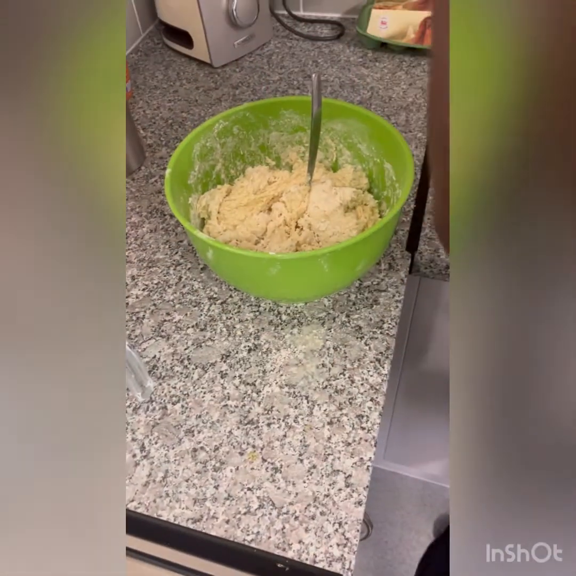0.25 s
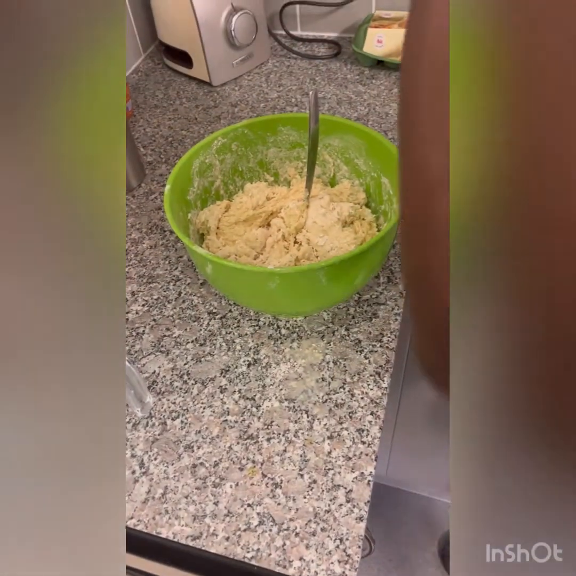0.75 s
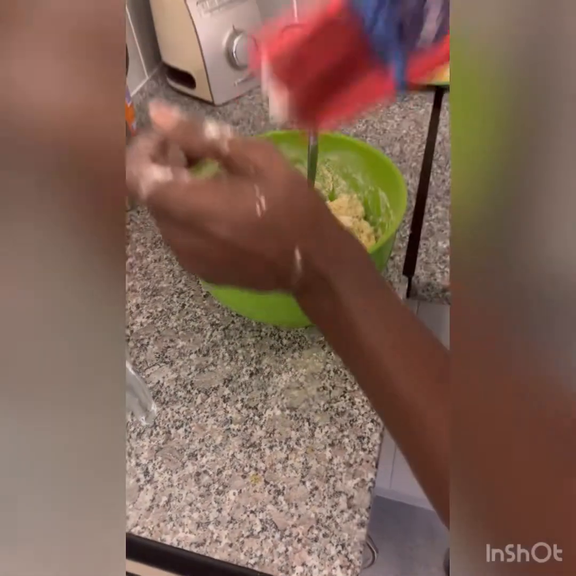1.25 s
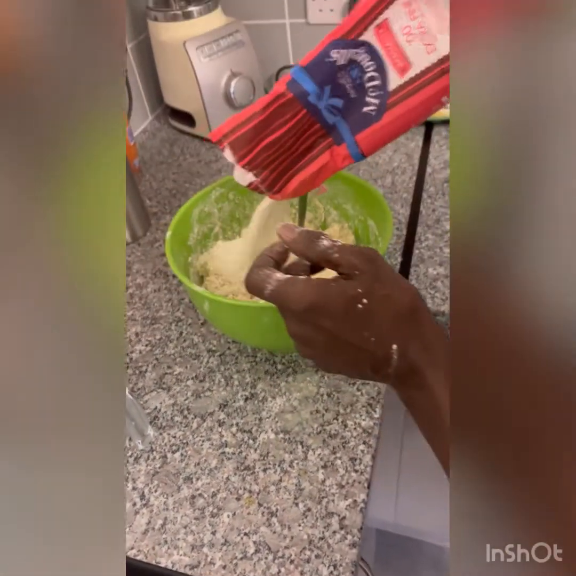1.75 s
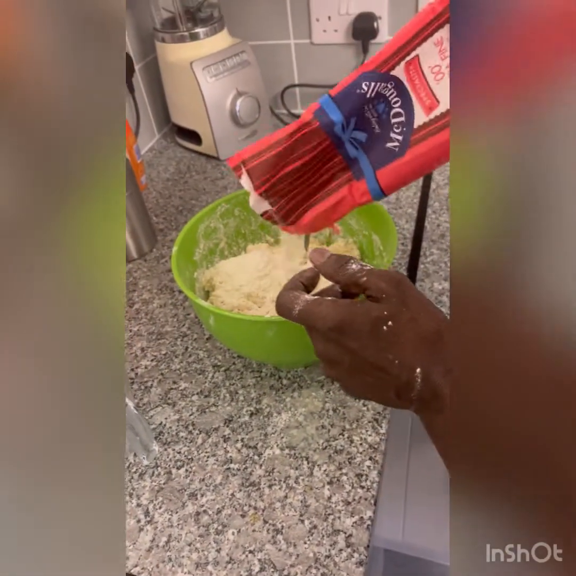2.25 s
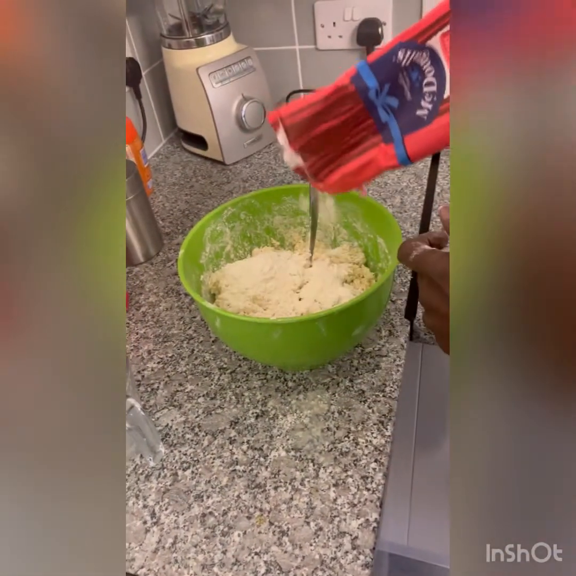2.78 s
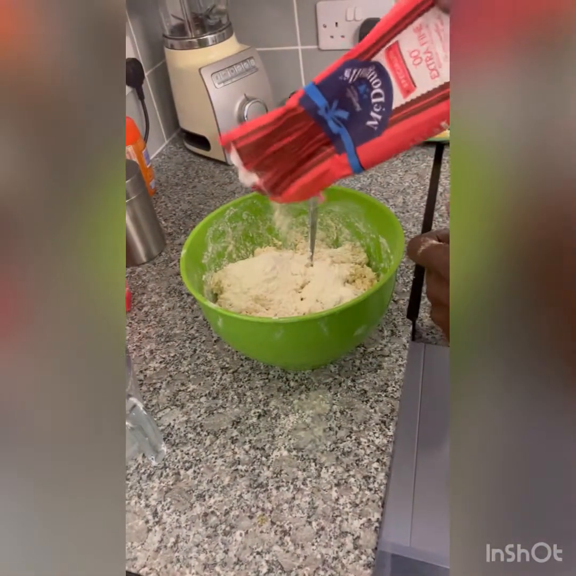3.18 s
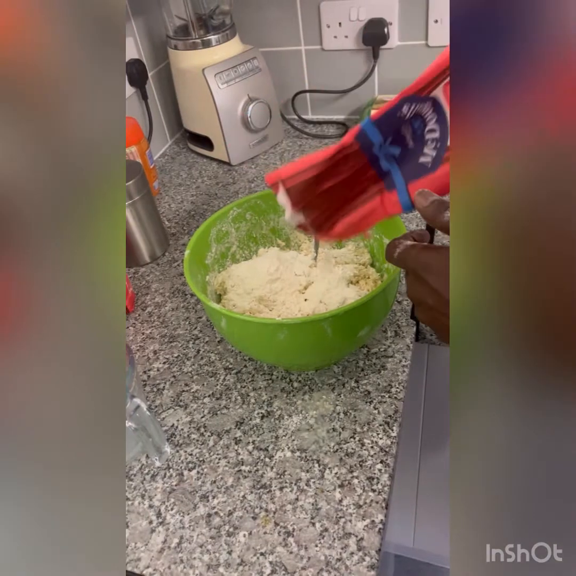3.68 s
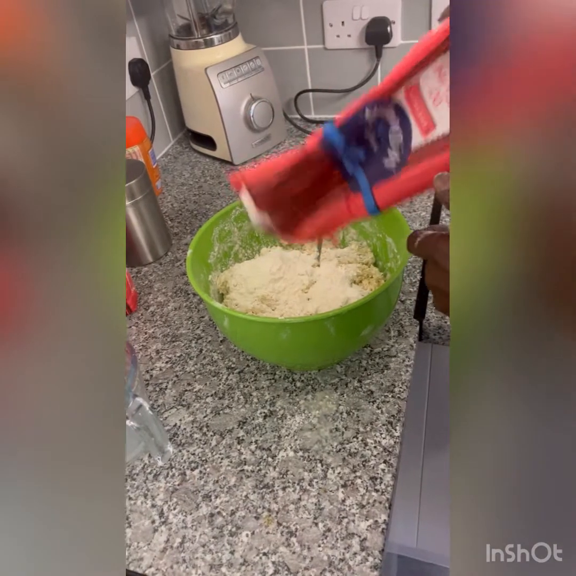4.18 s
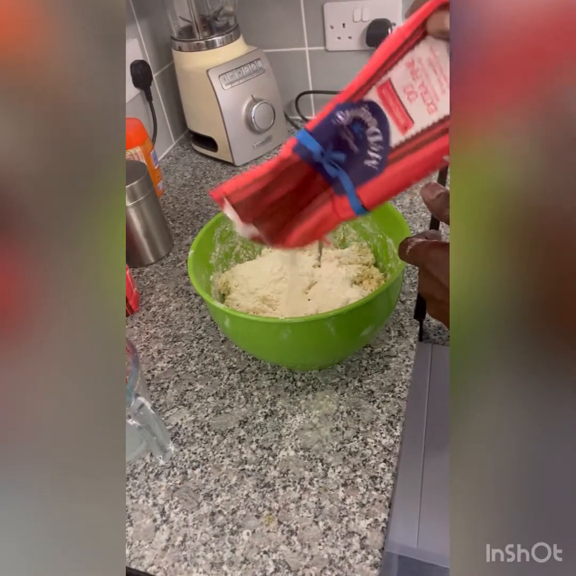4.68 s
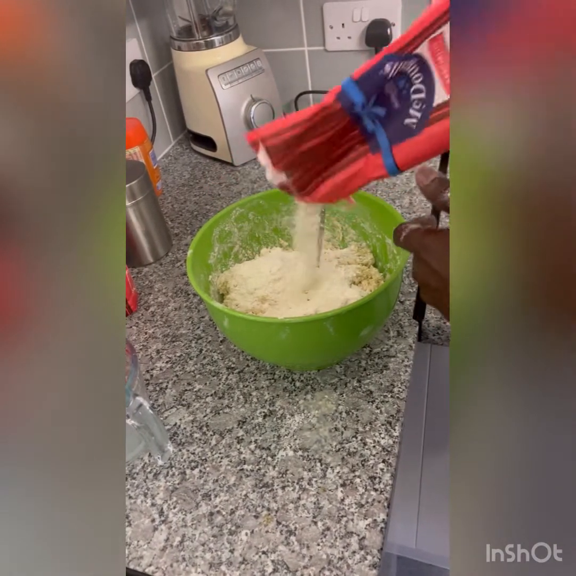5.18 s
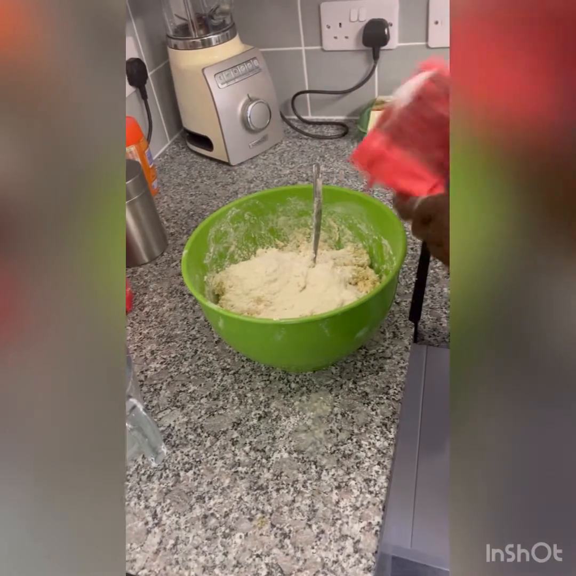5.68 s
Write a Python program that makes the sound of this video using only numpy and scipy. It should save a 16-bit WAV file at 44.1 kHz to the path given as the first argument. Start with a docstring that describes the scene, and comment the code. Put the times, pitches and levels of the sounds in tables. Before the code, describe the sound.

In a small tiled kitchen with a low steady rumble, a paper flour bag is gripped and crumpled loudly close to a phone for about a second. Then it gets much quieter: flour slides out in a soft hiss, with gentle rhythmic shakes and scattered dull paper pops. At the end the bag swings upright with a louder rustling rush and a sharp crackle.

```python
"""Loud crumpling comes first, over a low steady rumble, as a paper flour bag is picked up close to a phone.
The bag is then tipped and shaken over a bowl of dough, and at the end it is swung upright.
Its panels buckle with small falling pops: short bursts of noise and clicks ringing at each panel's pitch.
Gripping and rubbing paper is made of tiny random cracks in smooth noise; sliding flour is a soft hiss.
The rumble of the small kitchen is noise shaped to be strongest in the bass."""
import sys
import numpy as np
from scipy import signal
from scipy.fft import rfft, irfft, next_fast_len
from scipy.io import wavfile
from scipy.ndimage import uniform_filter1d, map_coordinates

SR = 44100
rng = np.random.default_rng(int(sys.argv[2]) if len(sys.argv) > 2 else 0)


def file_out(sig):
    """Save sig as 16-bit WAV at sys.argv[1]."""
    # one column per channel
    cols = np.atleast_2d(sig).T
    # limit, then scale
    lim = np.clip(cols, -1, 1)
    pcm = np.round(lim * 32767).astype(np.int16)
    wavfile.write(sys.argv[1], SR, pcm)


N = 261645
TOP_HZ = 16600  # nothing is heard above this pitch


def amp(db):
    """Turn decibels into gain."""
    return 10 ** (np.asarray(db) / 20)


def unit(x):
    """Scale x to an average strength (rms) of 1."""
    return x / np.sqrt(np.mean(x ** 2) + 1e-20)


def along(points, hz):
    """Read a curve of (pitch_hz, value) points, spacing pitch by ratio as the ear does."""
    point_hz, values = np.transpose(points)
    return np.interp(np.log(hz + 1), np.log(point_hz + 1), values)


def levels(rows):
    """Give a gain per sample for each dB column, fading to silence outside the rows."""
    s, *columns = np.transpose(rows)
    t = np.arange(N) / SR
    outside_s = np.abs(t - np.clip(t, s[0], s[-1]))
    fade_db = -300 * outside_s
    return [amp(np.interp(t, s, column) + fade_db) for column in columns]


def wobble(rate):
    """Draw a smooth random curve with `rate` random points a second."""
    points = rng.standard_normal(int(N * rate / SR) + 4)
    return map_coordinates(points, [np.arange(N) * rate / SR])


def filtered(x, response):
    """Change the strength and timing of each pitch in x by a response of frequency."""
    size = x.shape[-1]
    padded = next_fast_len(size + SR // 4)
    pitches_hz = np.fft.rfftfreq(padded, 1 / SR)
    return irfft(rfft(x, padded) * response(pitches_hz), padded)[..., :size]


def stereo(pair):
    """Mix two unrelated signals into left and right, whose likeness depends on pitch."""
    # how alike left and right are: pitch_hz, likeness (1 = the same)
    alike = [(100, 1), (400, 0.9), (1400, 0.45), (2000, 0.65), (2800, 0.089), (4200, .15), (5200, 0.96),
             (6300, 0.96), (8000, 1), (16000, .94)]

    def mid_and_side(hz):
        turn = np.arccos(np.clip(along(alike, hz), 0, .999)) / 2
        return np.array([np.cos(turn), np.sin(turn)])

    mid, side = filtered(pair, mid_and_side)
    return np.array([mid + side, mid - side])


def coloured(pair, spectrum):
    """Shape a pair by a spectrum (pitch_hz, relative level_db) into stereo sound of rms 1."""
    shaped = filtered(pair, lambda hz: amp(along(spectrum, hz)))
    return unit(stereo(shaped))


def creases(size, rate, spread_db, smooth):
    """Scatter tiny fibre cracks of uneven strength over smooth friction noise, as a pair of rms 1."""
    happens = rng.random(size) < rate / SR  # rate is cracks a second
    strength = amp(spread_db * np.minimum(rng.exponential(size=size), 3))
    cracks = unit(happens * strength * rng.standard_normal((2, size)))
    friction = smooth * rng.standard_normal((2, size))
    return unit(cracks + friction)


def patchy(x, depth_db):
    """Shift the paper's resonances as it bends: random patches of gain over pitch and time."""
    z = signal.stft(x, nperseg=512)[2]
    field = rng.standard_normal(z.shape[1:])
    field = uniform_filter1d(field, size=4, axis=0)  # blur over pitch
    field = uniform_filter1d(field, size=7, axis=1)  # blur over time
    return signal.istft(z * amp(depth_db * unit(field)), nperseg=512)[1][:, :N]


def kitchen():
    """Play a steady, slightly restless rumble under faint hiss, both made of shaped noise."""
    # rumble spectrum: pitch_hz, relative level_db
    rumble_spectrum = [(20, -41.5), (31, -32), (42, -5.5), (65, 0.5), (85, -4.5), (103, -8), (139, -15.5),
                       (190, -18), (240, -13), (300, -13), (370, -18.5), (700, -21.5), (1000, -22),
                       (1800, -42.5), (2400, -74)]
    hiss_spectrum = [(300, -4.5), (1000, 4.5), (1600, -7.5), (2300, -21), (4000, -19.0),
                     (15500, -27), (16500, -48)]
    rumble = coloured(rng.standard_normal((2, N)), rumble_spectrum)
    hiss = coloured(rng.standard_normal((2, N)), hiss_spectrum)
    return amp(-52.0 + .8 * wobble(6.4)) * rumble + amp(-69.5) * hiss


def room(x):
    """Answer x from tiled walls with a freshly drawn tail of fading noise, the top treble dying first."""
    # how fast the echo dies: pitch_hz, time to fall 60 dB in s
    walls = [(150, 0.22), (1000, 0.34), (4000, 0.5), (14000, 0.026)]
    hz, t, z = signal.stft(rng.standard_normal((2, SR // 3)), SR, nperseg=256)
    fade = amp(-60 * t / along(walls, hz)[:, None])
    build_up = 1 - np.exp(-t / 0.0016)
    tail = stereo(signal.istft(z * fade * build_up, SR, nperseg=256)[1])
    return signal.fftconvolve(x.mean(axis=0)[None], tail / np.linalg.norm(tail[0]), axes=1)


def pouring():
    """Slide flour along the paper in long runs and a soft puff with each shake, while the paper rubs."""
    # flour sliding as the bag is moved: time_s, relative flow level_db
    first_pour = [(1.22, -75), (1.26, -72), (1.278, -61.5), (1.53, -62), (1.64, -70.5), (1.848, -70),
                  (1.9, -82)]
    tilt_back = [(2.62, -101), (2.644, -93), (2.698, -64.5), (2.88, -101)]
    second_pour = [(2.966, -73.5), (3.012, -53.5), (3.044, -68), (3.232, -73.5), (3.236, -67),
                   (3.314, -66.5), (3.382, -82), (3.5, -84.5)]
    swing_upright = [(5.38, -96), (5.408, -80.5), (5.62, -51.5), (5.668, -58.5), (5.906, -54), (5.93, -58)]
    # shakes of the wrist, about six a second: peak time_s, relative flow level_db
    shakes = [(1.978, -71.5), (2.136, -68.5), (2.28, -85.5), (2.435, -79), (3.648, -76.5), (3.804, -75),
              (4.124, -71.5), (4.274, -73), (4.445, -72), (4.601, -68), (4.769, -69), (4.944, -75),
              (5.1, -64.5), (5.225, -78)]
    # paper rubbing compared with flow, strong at first, weak during the first pour,
    # then about as strong as the flow: time_s, rubbing over flow in db
    rub_share = [(1.2, 4.5), (1.35, -10.5), (2.45, -8), (2.7, 0), (4.3, -1.5), (5.8, 1.5)]
    # spectra of rubbing paper and of flour: pitch_hz, relative level_db
    rub_spectrum = [(150, -13), (480, 4), (850, 0.5), (1550, 7), (2100, 1.5), (2900, 0), (4000, -3.5),
                    (5000, 0), (8000, -9), (16000, -30)]
    flour_spectrum = [(600, -22), (2000, -7.5), (4000, -5), (5500, -3), (8000, -4), (10000, -2),
                      (12000, -5.5), (15600, -4), (16200, -30)]
    shake_rise_s, shake_fall_s = 0.053, 0.055

    t = np.arange(N) / SR
    # flows add as power, so every gain is squared
    flow = sum(levels(move)[0] ** 2 for move in (first_pour, tilt_back, second_pour, swing_upright))
    for s, flow_db in shakes:
        width_s = np.where(t < s, shake_rise_s, shake_fall_s)
        flow += amp(flow_db) ** 2 * np.exp(-2 * ((t - s) / width_s) ** 2)
    rub = flow * amp(np.interp(t, *np.transpose(rub_share))) ** 2
    rubbing = patchy(creases(N, rate=820, spread_db=2, smooth=0.88), depth_db=2.7)
    paper = coloured(rubbing, rub_spectrum)
    powder = coloured(rng.standard_normal((2, N)), flour_spectrum)
    return amp(6.5 + 0.31 * wobble(30)) * np.sqrt(rub) * paper + amp(4.5) * np.sqrt(flow) * powder


def gripping():
    """Squeeze the bag with the fingers: its walls flex dully and its folds crinkle."""
    # the bag gripped and lifted: time_s, relative flexing level_db, relative crinkling level_db
    grip = [(0.0, -40, -49.5), (0.112, -35.5, -43.5), (0.246, -35.5, -42), (0.538, -42, -47.5),
            (0.744, -38, -51), (0.868, -43, -45), (0.958, -49, -47.5), (1.088, -59.5, -54.5),
            (1.2, -62.5, -67.5)]
    # spectra of the flexing walls and crinkling folds: pitch_hz, relative level_db
    flex_spectrum = [(60, -15.5), (130, 6), (240, -3), (320, -1.5), (480, 4.5), (1050, -3.5), (1800, -6.5),
                     (3000, -32.5), (6000, -62)]
    crinkle_spectrum = [(500, -27.5), (1500, -6.5), (2000, 3), (3000, 5), (4200, 2), (5500, 0.5),
                        (7500, -4.5), (11000, -7), (15000, -10), (16500, -25)]
    flex, crinkle = levels(grip)
    flexing = patchy(creases(N, rate=1200, spread_db=1.5, smooth=0.76), depth_db=3.2)
    crinkling = patchy(creases(N, rate=2400, spread_db=2.8, smooth=.55), depth_db=2.8)
    walls = coloured(flexing, flex_spectrum)
    folds = coloured(crinkling, crinkle_spectrum)
    return amp(-2.0) * flex * walls + amp(1.5 + 0.64 * wobble(45)) * crinkle * folds


def buckle(pop_db, pop_hz, thump_db, crackle_db, length):
    """Snap one panel through, with a run of creases that swells and dies behind it."""
    # spectra of the ringing panel, dull thump and bright crackle: pitch_hz, relative level_db
    panel_spectrum = [(120, -43), (350, 4.5), (500, 2), (1100, 1.5), (2000, -2), (3200, -7.5),
                      (7000, -46.5)]
    thump_spectrum = [(45, -21.5), (95, -1), (150, 5), (220, -3), (330, -17.5), (600, -22.5), (1500, -59)]
    snap_spectrum = [(900, -23), (2200, -2), (3100, 4), (4200, -2), (5500, 0.5), (7000, -6.5), (8000, -9),
                     (10000, -8), (15000, -19), (16500, -40)]
    size = SR // 5
    t = np.arange(size) / SR
    lead_in = SR // 100  # silent samples ahead of the snap

    def late(x):
        return np.pad(x, ((0, 0), (lead_in, 0)))

    swell = 1 - np.exp(-t / (0.079 * length))
    fade = amp(-40 * t / (length + .005))
    run = creases(size, rate=2500, spread_db=2.0, smooth=0.97) * swell * fade
    run /= np.linalg.norm(run[0])

    # the shorter the crumpling, the more of it lies in the first snap
    suddenness = np.exp(-length / 0.027)
    snap = np.zeros((2, size))
    snap[0, 0] = 2 * suddenness

    # the snap cracks brightly for about a millisecond
    crack = np.diff(rng.standard_normal((2, size)), prepend=0) * np.exp(-t / .0008)
    crack *= 2.5 * suddenness / np.linalg.norm(crack[0])

    def ring(hz):
        # the panel rings at its own pitch and radiates little above it
        resonance = 0.47 + 1 / (1 + 1.6j * (hz / pop_hz - pop_hz / (hz + 1)))
        return resonance / np.sqrt(1 + (hz / (2 * pop_hz)) ** 4)

    pop = coloured(filtered(late(run + snap), ring), panel_spectrum)
    thump = coloured(late(run + 2 * snap), thump_spectrum)
    crackle = coloured(late(run + crack), snap_spectrum)
    parts = amp(pop_db) * pop + amp(thump_db) * thump + amp(crackle_db) * crackle

    # every fold has treble resonances of its own
    knots = rng.standard_normal(size=90)
    knots_hz = np.linspace(0, TOP_HZ, len(knots))
    lag_s, knee_hz = .02, 280

    def fold_and_fall(hz):
        fold = amp(3.9 * np.interp(hz, knots_hz, knots) * np.minimum(hz / 2500, 1))
        # bending waves in paper are slower at low pitch, so each pop falls like a drip
        delay = np.exp(-2j * np.pi * lag_s * knee_hz * np.arctan(hz / knee_hz))
        return fold * delay

    return filtered(parts, fold_and_fall), lead_in


def buckles():
    """List crumples and single pops: start_s, room_db, pop_db, pitch_hz, thump_db, crackle_db, length_s."""
    # the bag crumpling under the fingers:
    # start_s, relative strength_db, panel pitch_hz, length_s, relative thump_db
    crumples = [(0.0582, -26.5, 990, 0.024, -32), (0.0652, -25.5, 1000, 0.019, -31),
                (0.087, -29.5, 980, 0.029, -52), (0.164, -31, 890, 0.023, -28.5),
                (0.235, -34, 890, 0.039, -35), (0.322, -33, 1980, 0.04, -54), (0.362, -32, 890, 0.05, -49),
                (0.49, -33, 1220, 0.041, -62), (0.579, -37.5, 1050, 0.057, -51),
                (0.647, -37.5, 610, 0.018, -41.5), (0.718, -33.5, 1100, 0.04, -38),
                (0.752, -23.5, 1010, 0.011, -34), (0.759, -25.5, 585, 0.029, -31),
                (0.801, -33, 850, .027, -38), (0.8872, -25, 1020, 0.013, -47),
                (0.994, -40, 1030, 0.037, -60), (1.123, -45.5, 664, 0.022, -58),
                (1.438, -53.5, 750, 0.055, -52.5), (2.643, -60, 1800, 0.072, -69),
                (2.684, -52, 700, .04, -64), (2.9446, -48, 790, 0.017, -42.5),
                (2.999, -53.5, 2500, 0.046, -62), (3.109, -56.5, 900, 0.02, -49),
                (4.205, -64.5, 1000, 0.026, -56), (4.272, -67, 1500, 0.011, -67),
                (5.585, -41.5, 1200, 0.017, -51), (5.609, -35.5, 860, 0.0097, -39)]
    # single panels popping through: start_s, relative strength_db, pitch_hz
    pops = [(0.243, -32, 427), (0.412, -37.5, 950), (0.505, -34.5, 840), (0.959, -36, 2070),
            (1.02, -41, 1170), (1.879, -42, 355), (3.034, -43.5, 390), (3.062, -47, 700),
            (3.158, -41.5, 565), (3.533, -57.5, 900), (3.7425, -41.5, 1048), (3.829, -58.5, 1794),
            (4.407, -49, 880), (4.509, -45, 700), (4.609, -54.5, 890), (4.718, -40, 1380),
            (5.115, -47.5, 1200), (5.521, -44, 804), (5.841, -45, 580), (5.905, -42.5, 1280)]
    middle_hz = 900  # a panel of middle pitch
    crumple_room_db, pop_room_db = -6, -8  # echo compared with the direct sound
    pop_length_s = .007

    # a higher panel crackles more; crackle and pop thump are set against the strength
    for s, db, hz, length, thump_db in crumples:
        crackle_db = db + 0.5 + 3.5 * np.log2(hz / middle_hz)
        yield s, crumple_room_db, db, hz, thump_db, crackle_db, length
    # a higher single pop also thumps less
    for s, db, hz in pops:
        octaves = np.log2(hz / middle_hz)
        thump_db = db - 7 - 5 * octaves
        crackle_db = db - 19 + 12 * octaves
        yield s, pop_room_db, db, hz, thump_db, crackle_db, pop_length_s


def buckling():
    """Place every buckle; its paper sends another colour to the walls behind, and both sides echo."""
    out = np.zeros((2, N + SR))
    for s, room_db, *blow in buckles():
        front, lead_in = buckle(*blow)
        back, _ = buckle(*blow)
        start = max(round(s * SR) - lead_in, 0)
        wet = amp(room_db) / np.sqrt(2)  # shared between the two echoes
        for part in (front, wet * room(front), wet * room(back)):
            out[:, start:start + part.shape[1]] += part
    return amp(-13.5) * out[:, :N]


def scene():
    """Add the kitchen's rumble, the pouring flour, the gripped paper and the buckling panels."""
    return kitchen() + pouring() + gripping() + buckling()


def record(dry):
    """Shift phase between the phone's two microphone ports and let nothing through above TOP_HZ."""
    # how far the left port leads the right: pitch_hz, phase in radians
    lead = [(0, 0), (600, -.45), (1400, -.3), (1850, 0), (3500, -.2), (5200, 2.2), (6000, 3.14),
            (7950, 6.28), (10150, 9.42), (12500, 12.57), (17000, 18.7)]

    def ports(hz):
        half_lead = np.interp(hz, *np.transpose(lead)) / 2
        return np.exp(1j * np.array([half_lead, -half_lead])) * (hz < TOP_HZ)

    return filtered(dry, ports)


dry = scene()
out = record(dry)
file_out(out)
```